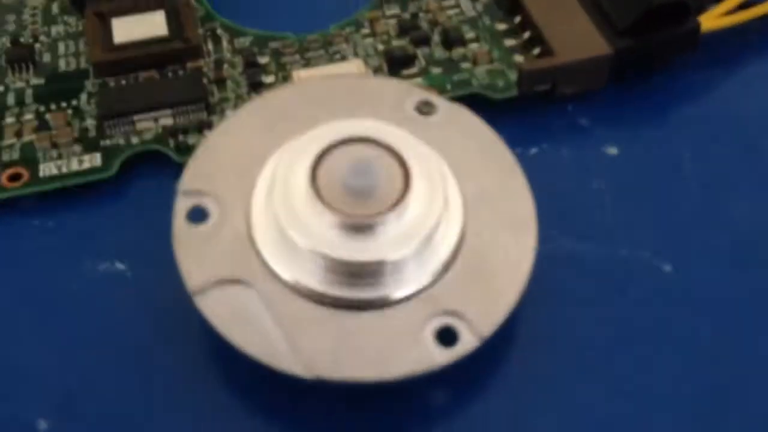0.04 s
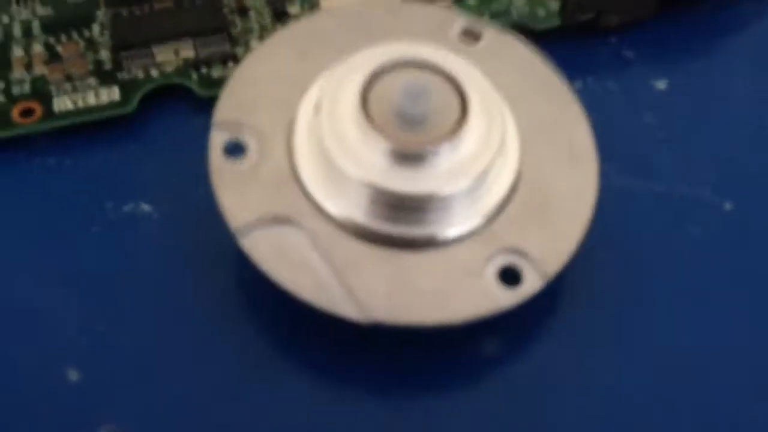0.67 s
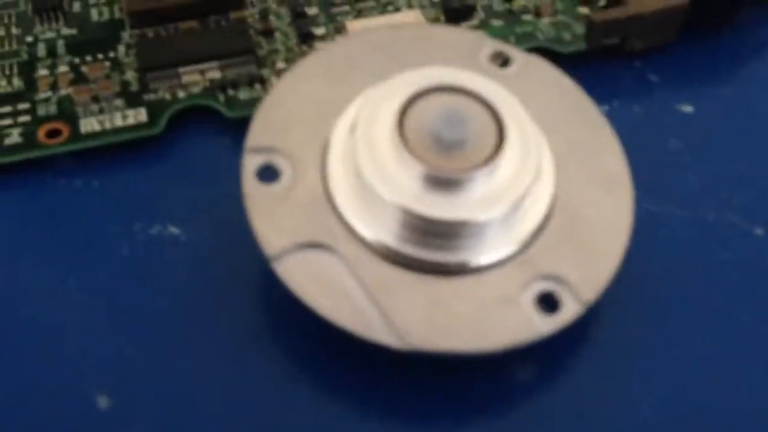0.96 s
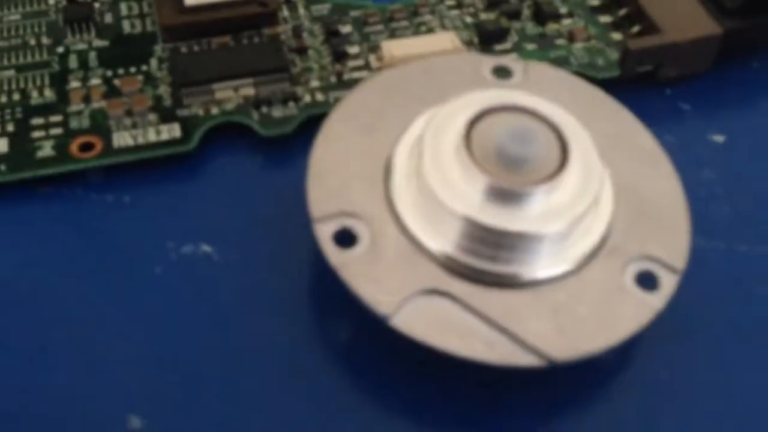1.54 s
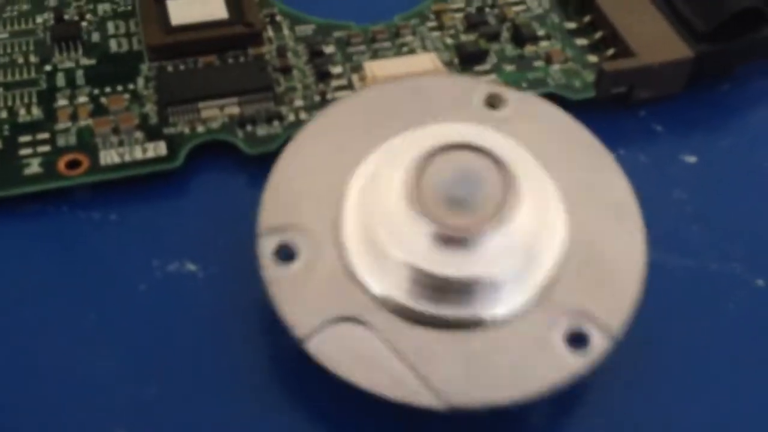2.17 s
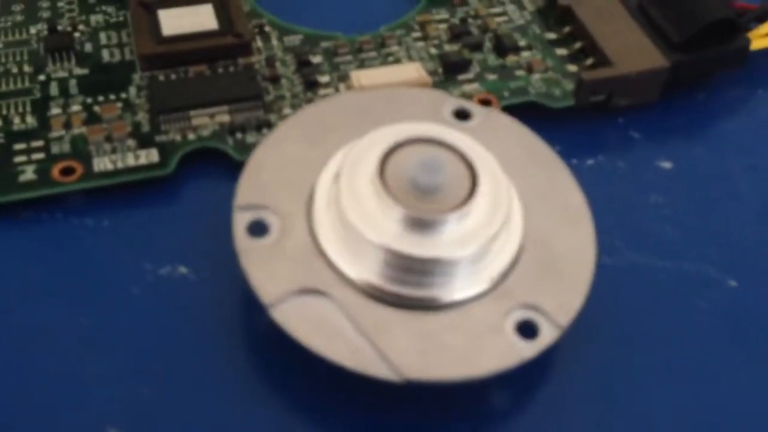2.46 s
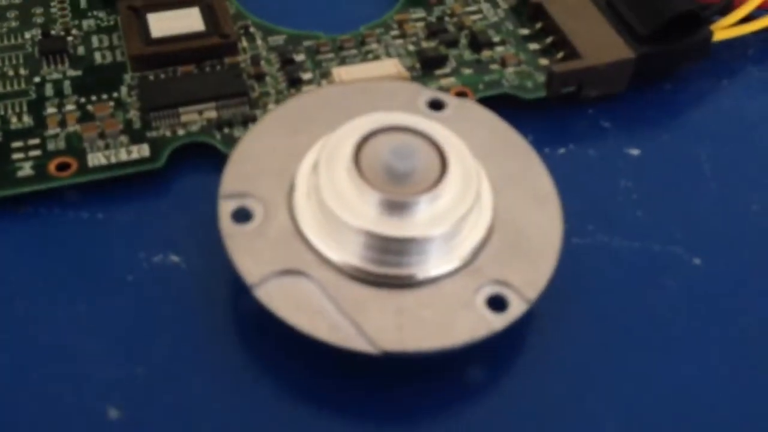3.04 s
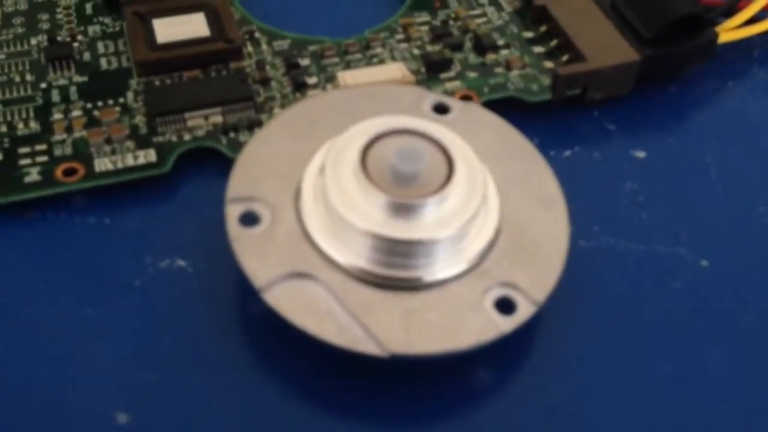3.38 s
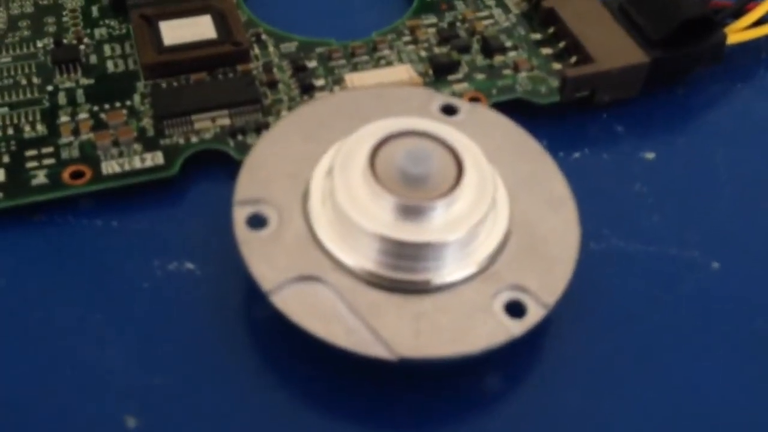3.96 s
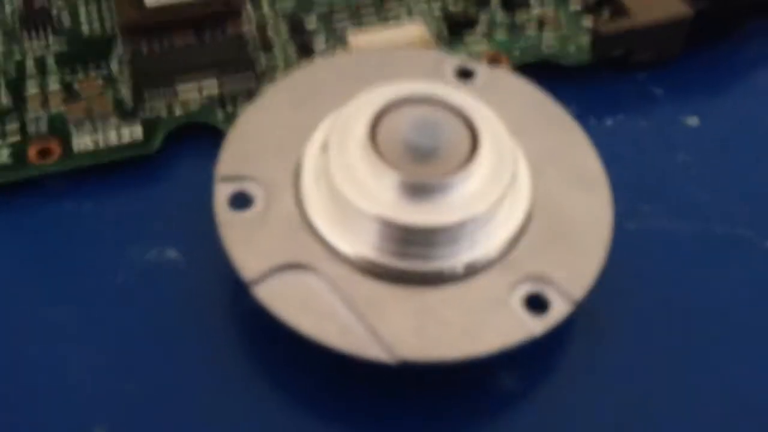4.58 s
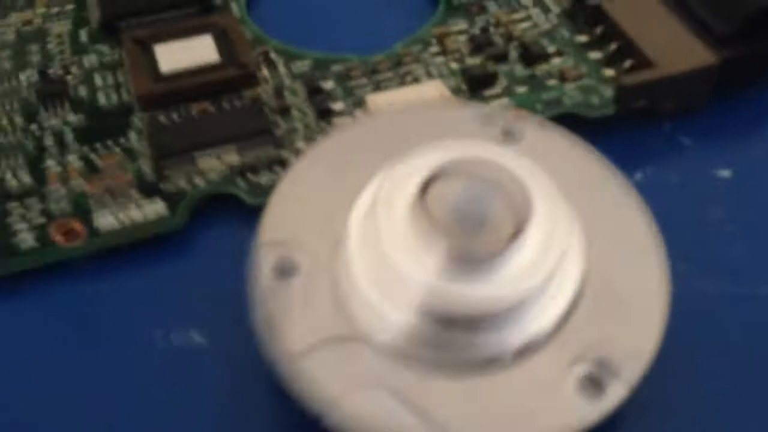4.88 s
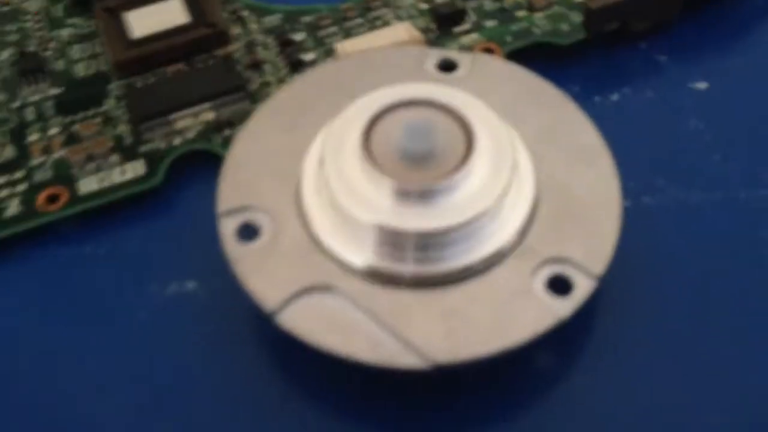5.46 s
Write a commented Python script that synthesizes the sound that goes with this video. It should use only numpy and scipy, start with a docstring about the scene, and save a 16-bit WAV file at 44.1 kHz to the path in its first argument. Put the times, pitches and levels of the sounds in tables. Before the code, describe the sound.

Close to the microphone in a quiet room, a small spindle motor hums and gives a thin, wavering whine as its metal base buzzes against a table. Three times it shifts with sharp knocks and a brief scrape. The whine turns clean and steady after the first and last shifts; between the second and third it warbles while the base rocks, clicks and rattles.

```python
"""A bare hard-disk motor spins loose on a table, close to the microphone.
Its ball bearing makes the metal hub whine near 7 kHz: the whine warbles while the drive hunts for
speed (kicks, coasts, kicks again) and is clean while the drive holds a lower speed.
The unbalanced rotor hums through the table. The motor's base buzzes, rocks and knocks,
and three times it slides to a new seat."""
import sys
import numpy as np
from scipy import signal
from scipy.fft import rfft, irfft, next_fast_len
from scipy.io import wavfile
from scipy.ndimage import uniform_filter1d, map_coordinates

SR = 44100
rng = np.random.default_rng(int(sys.argv[2]) if len(sys.argv) > 2 else 0)


def dump_mix(stems):
    """Bounce the given channels to the path in sys.argv[1] as a 16-bit WAV at rate SR."""
    frames = np.atleast_2d(stems).T  # one column per channel
    limited = np.clip(frames, -1, 1)  # hard clip at full scale
    pcm = np.round(limited * 32767).astype(np.int16)
    wavfile.write(sys.argv[1], SR, pcm)


N = 243412
TIME = np.arange(N) / SR
FFT_SIZE = next_fast_len(N)
FREQ = np.maximum(np.fft.rfftfreq(FFT_SIZE, 1 / SR), 1)
ROCK_FROM_S, ROCK_TO_S, STILL_DB = 2.14, 4.81, -56  # when the base rocks; its level otherwise
SETTLE_S = 0.0086  # the base settles this quickly

# how the shaft spins: time_s, speed_hz, hunting (0 steady to 1 full), kick_rate_hz
SHAFT_SPEED = [(0, 90, 1, 18.2), (1.07, 90, 1, 18.2), (1.2, 85, .7, 18), (1.42, 79.83, 0, 18),
               (2.09, 79.83, 0, 20), (2.36, 90, 1, 21), (4.78, 90, 1, 21.5), (4.9, 84, .3, 21),
               (5.07, 79.83, 0, 21)]
# how close the hand-held microphone is: time_s, gain_db
CLOSENESS = [(0, -1.5), (.3, -0.5), (1.2, 2), (2.6, -1), (3.7, -3.5), (4.6, 3), (5.52, 1)]
# the notes that base and table ring with: pitch_hz, width_hz, level_db
TABLE_MODES = [(122.5, 3.8, 0), (260.3, 7.7, 7), (501.3, 19.6, 21.5), (727, 20, 10.5), (1324, 24, 13.5),
               (1475, 23, 10), (1818, 57, 13.5), (2115, 5.1, -22), (2620, 80, -2), (3050, 24, -10),
               (3720, 54, -15), (4080, 120, -8)]
# tone colour of a blow on the table: pitch_hz, level_db
BLOW_COLOUR = [(25, -31.5), (100, 7.5), (300, 3), (720, 1.5), (1050, -0.5), (1400, -15.5), (2250, -3),
               (2800, -29), (4300, -27.5), (8000, -35), (15000, -39)]
# tone colour of metal ticking or scraping: pitch_hz, level_db
METAL_COLOUR = [(1500, -6), (2600, -8), (4000, 3.5), (4800, -2.5), (5700, 5.5), (7400, -1.5), (8200, -10),
                (10000, -2), (12000, -5), (14200, 1), (15400, -22)]


def undb(db):
    """Turn decibels into a gain."""
    return np.exp(np.asarray(db) * np.log(10) / 20)


def unit(x):
    """Scale to an average (rms) level of 1."""
    return x / np.sqrt(np.mean(x ** 2))


def curves(table):
    """Join the rows of a timed table with straight lines: one value a sample for each column."""
    times_s, *columns = np.transpose(table)
    return [np.interp(TIME, times_s, column) for column in columns]


def noise():
    """White noise."""
    return rng.standard_normal(N)


def smooth(x, length_s):
    """Moving average."""
    return uniform_filter1d(x, max(int(length_s * SR), 1))


def wander(rate_hz):
    """A smooth random drift, about 1 in size."""
    hold = int(SR / rate_hz)
    steps = np.repeat(noise()[:N // hold + 1], hold)
    return unit(uniform_filter1d(uniform_filter1d(steps, hold), hold)[:N])


def colour(points):
    """Gain at every frequency, from points of pitch_hz, level_db."""
    hz, db = np.transpose(points)
    return undb(np.interp(np.log(FREQ), np.log(hz), db))


def resonances(modes):
    """Gain at every frequency, from peaks of pitch_hz, width_hz, level_db."""
    peaks = (undb(db) / (1 + (2 * (FREQ - hz) / width) ** 2) for hz, width, db in modes)
    return np.sqrt(sum(peak ** 2 for peak in peaks))


def shape(x, gain):
    """Filter with a gain for each frequency; the result has level 1."""
    return unit(irfft(rfft(x, FFT_SIZE) * gain, FFT_SIZE)[:N])


def snap(gain):
    """The shortest click with this tone colour; its peak is 1."""
    cepstrum = irfft(np.log(gain), FFT_SIZE)
    cepstrum[FFT_SIZE // 2:] = 0  # nothing sounds before the hit
    pulse = irfft(np.exp(2 * rfft(cepstrum)), FFT_SIZE)[:SR // 4]
    return pulse / np.abs(pulse).max()


def ring_body(force, gain):
    """A force rings a body with this tone colour; the result has level 1."""
    return unit(signal.fftconvolve(force, snap(gain))[:N])


def burst(gain):
    """A short stretch of noise with this tone colour."""
    coarse = gain[::32]
    return irfft(coarse * rfft(rng.standard_normal(2 * len(coarse) - 2)))


def fade(t, t60):
    """A decay that falls 60 dB in t60 seconds."""
    return np.exp(-np.log(1000) * t / t60)


def trail(hits, decay_s):
    """Give every hit a dying tail."""
    return signal.lfilter([1], [1, -np.exp(-1 / (decay_s * SR))], hits)


def swell(start_s, length_s, roundness=0.44):
    """An arch that rises and falls; less roundness makes its ends more abrupt."""
    along = np.clip((TIME - start_s) / length_s, 0, 1)
    return (4 * along * (1 - along)) ** roundness


def add(out, start_s, sound):
    """Mix a sound in at a given time."""
    i = int(start_s * SR)
    out[i:i + len(sound)] += sound[:N - i]


def room(level_db=-50.5):
    """The quiet room: a low rumble and a faint hiss."""
    room_colour = [(20, -69), (60, 10), (200, -4.5), (400, -7), (850, -65), (1300, -15), (2200, -25.5),
                   (2800, -25), (6000, -27.5), (9000, -25.5), (14400, -37), (15000, -62)]  # pitch_hz, level_db
    return shape(noise(), colour(room_colour)) * undb(level_db)


def seating():
    """Levels in dB of rotor hum, mains hum and buzz, which depend on how the base sits."""
    # each resting place: start_s, rotor_db, mains_db, buzz_db
    seats = [(0, -41, -75, -42), (1.14, -38.5, -46, -55.5), (2.2, -36.5, -44.5, -56), (5.01, -37, -46, -57)]
    starts_s, *columns = np.transpose(seats)
    seat = np.searchsorted(starts_s[1:], TIME)
    return [smooth(column[seat], SETTLE_S) for column in columns]


def shaking_db(coast_db_per_hz_s=-0.0068, near_share=0.28):
    """The shaking sounds weaker while the rotor slows down, and stronger close up."""
    slowing_hz_s = np.maximum(-np.gradient(curves(SHAFT_SPEED)[0]) * SR, 0)
    return coast_db_per_hz_s * smooth(slowing_hz_s, SETTLE_S) + near_share * curves(CLOSENESS)[0]


def is_rocking():
    """1 while the base rocks and 0 otherwise, with quick ramps between."""
    return np.clip(np.minimum(TIME - ROCK_FROM_S, ROCK_TO_S - TIME) / SETTLE_S + .5, 0, 1)


def rocking_db(start_db=-58, rise_db_per_s=2.5):
    """In the second run at full speed the base rocks harder and harder."""
    build_db = start_db + rise_db_per_s * (TIME - ROCK_FROM_S)
    return STILL_DB + is_rocking() * (build_db - STILL_DB)


def chatter(scuffs_per_s=42, decay_s=0.024, gain_db=-5):
    """Random scuffs as the base rocks: dull ones on its face, brighter ones on its rim."""
    face = colour(BLOW_COLOUR) * (1 + resonances(TABLE_MODES) / 2)
    rim = resonances([(1850, 1100, 0), (3900, 1500, -10)])
    out = 0
    for gain, db in [(face, 0), (rim, -7)]:
        starts = rng.random(N) < scuffs_per_s / 2 / SR
        strengths = undb(7 * rng.uniform(-1, 1, N))
        out = out + shape(noise(), gain) * trail(starts * strengths, decay_s) * undb(db)
    return out * undb(rocking_db() + gain_db) * is_rocking()


def rattles(t60=0.058, gain_db=1):
    """The rim clicks on the table: a ring whose pitch depends on the spot, a hollow body, an edge."""
    # the clicks: start_s, level_db, pitch_hz, metal_edge_db
    clicks = [(1.719, -42, 3600, 7), (2.41, -34, 1770, -21), (2.490, -42, 1080, -3),
              (2.533, -37, 1940, -13), (2.578, -40, 1910, -26), (2.635, -38.5, 1870, -14),
              (2.678, -32, 1830, -10), (2.795, -43, 1900, -11), (2.865, -40, 1920, -11),
              (2.921, -40, 1830, -16), (3.041, -39, 2200, -9), (3.134, -32, 1850, -14),
              (3.309, -43, 2220, -9), (3.341, -43, 1100, -8), (3.411, -37, 1500, -5),
              (3.511, -40.5, 2070, -9), (3.631, -41, 1600, -14), (3.677, -41, 2250, -18),
              (3.731, -40, 1870, -17), (3.791, -38, 1850, -9), (3.843, -47, 1850, -18),
              (3.887, -38, 1960, -8), (4.076, -37.5, 1960, -15), (4.109, -45, 2230, -14),
              (4.143, -46, 2270, -13), (4.168, -34.5, 1850, -17), (4.200, -39, 2220, -20),
              (4.297, -42, 1960, -12), (4.386, -42.5, 2180, -8), (4.444, -40, 1900, -7),
              (4.545, -39, 2100, -7), (4.588, -43, 2270, -18), (4.644, -36, 1520, -9)]
    out, t = np.zeros(N), TIME[:SR // 8]
    hollow = resonances([(900, 600, -1)]) + undb(-6) * colour(BLOW_COLOUR)
    edge = resonances([(3900, 1500, 0)])
    for start_s, level_db, pitch_hz, edge_db in clicks:
        gain = resonances([(pitch_hz, 420, 2)]) + hollow + undb(edge_db) * edge
        ring = burst(gain)[:len(t)] * fade(t, t60)
        add(out, start_s, undb(level_db + gain_db) * ring / np.abs(ring).max())
    return out


def ticks(t60=0.02, rise_s=0.002, tail_db=-26, tail_t60=0.12):
    """Brief bright snaps of metal, each with a faint ring after it."""
    # the snaps: start_s, level_db, hold_s
    metal_snaps = [(1.132, -45.5, 0.0027), (1.2, -22, 0.0013), (2.123, -33.5, 0.012), (4.917, -50.5, 0.047)]
    out, t = np.zeros(N), TIME[:SR // 4]
    for start_s, level_db, hold_s in metal_snaps:
        after = np.maximum(t - hold_s, 0)
        envelope = (1 - fade(t, rise_s)) * (fade(after, t60) + undb(tail_db) * fade(after, tail_t60))
        metal = shape(noise(), colour(METAL_COLOUR))[:len(t)]
        add(out, start_s, undb(level_db) * metal * envelope)
    return out


def judders(turns, width_hz=420, grip=0.12, body_db=-9):
    """The rim sticks and slips once a turn, which rings a hollow note in base and table."""
    # where the rim catches: start_s, length_s, level_db, pitch_hz
    catches = [(1.034, 0.059, -33, 674), (1.177, 0.019, -34.5, 790), (1.212, 0.011, -25.5, 620),
               (1.263, 0.024, -28, 676), (1.341, 0.03, -32, 720), (2.109, 0.029, -29, 735),
               (2.193, 0.034, -32, 560), (4.947, 0.023, -35.5, 655), (5.001, 0.024, -27, 470),
               (5.069, 0.043, -45, 786)]
    slips = noise() * np.exp(grip * np.cos(2 * np.pi * turns))
    body, out = undb(body_db) * colour(BLOW_COLOUR), 0
    for start_s, length_s, level_db, pitch_hz in catches:
        note = resonances([(pitch_hz, width_hz, 0)])
        groan = shape(slips, note + body * resonances([(pitch_hz, 6 * width_hz, -6)]))
        arch = swell(start_s, length_s)
        out = out + undb(level_db) * arch * groan / np.std(groan[arch > 0])
    return out


def sliding(jerk_db=2, jerk_hz=45):
    """Gains of the scrape and of the table's drumming: each slide swells, jerks and dies away."""
    # moves to a new seat: start_s, length_s, scrape_db, drumming_db
    slides = [(1.167, 0.24, -43, -36), (2.089, 0.28, -40.5, -38), (4.91, 0.19, -39, -37.5)]
    gains = sum(np.outer(undb(levels_db), swell(start_s, length_s))
                for start_s, length_s, *levels_db in slides)
    return gains * undb(jerk_db * wander(jerk_hz))


def buzz(turns, gain_db=1, tap_s=0.0025, scatter_db=1.2, rub_db=-2, chirp_db=-24, rasp_db=-25):
    """The rim grazes the table once a turn and rubs in between; a slide adds drumming and a rasp."""
    # how hard the rim presses: time_s, gain_db
    pressure = [(0, 1), (.105, 1.5), (.12, -1.5), (.19, 1.5), (.23, -1), (.31, 2.5), (.435, -.5),
                (.62, 1.5), (.696, -1), (.744, 1), (.99, .5)]
    # tone colour of the buzzing table: pitch_hz, level_db
    buzz_colour = [(120, -29), (200, 2), (263, -1), (308, -6), (385, 4), (437, -5.5), (473, -12), (580, -1),
                   (840, 4.5), (1070, -1), (1390, -24), (1490, -5.5), (1700, -21.5), (1990, -1),
                   (2470, -28.5), (3000, -20.5), (3900, -18), (6600, -120)]
    # notes of the chirping rim and of the drumming table top: pitch_hz, width_hz, level_db
    rim_modes = [(3200, 77, -2.5), (3460, 49, -11), (3920, 87, -21), (4250, 230, -15)]
    drum_modes = [(156.5, 28, 5), (235, 40, -3), (514, 51, -0.5)]
    _, _, seat_db = seating()
    press_db, = curves(pressure)
    angle = turns + .055 * wander(150)  # each tap comes a little early or late
    taps = np.diff(np.floor(angle), prepend=0) * undb(scatter_db * noise())
    grazes = trail(taps, tap_s) * noise()
    rub = noise() * np.exp(0.13 * np.cos(2 * np.pi * (angle - 1 / 6)))
    contact = unit(taps) / 2 + unit(grazes) + undb(rub_db) * unit(rub)
    table = ring_body(contact, colour(buzz_colour) * (1 + 0.47 * resonances(TABLE_MODES)))
    rim = ring_body(contact, resonances(rim_modes)) * undb(chirp_db)
    scrape, drumming = sliding()
    drum = shape(noise(), resonances(drum_modes)) * drumming
    rasp = shape(noise(), colour(METAL_COLOUR)) * scrape * undb(rasp_db)
    strength = np.hypot(undb(seat_db + press_db + shaking_db()), scrape) * undb(gain_db)
    return (table + rim) * strength + drum + rasp


def knocks(contact_s=0.003, ring_db=-13, bounce_db=-12, tail_db=-22, thump_db=-16, edge_db=-40.5):
    """The base hits the table: a hollow blow, bounces, a ring, a thump, a metal edge and a room tail."""
    # the hits: start_s, level_db, landing (about -1 flat on its face to 1 on its rim)
    hits = [(0.287, -24, -0.072), (0.602, -26.5, -0.34), (1.064, -12.5, -0.047), (1.122, -23, -0.061),
            (1.1925, -17, -0.29), (1.226, -28, -0.12), (1.255, -39, -0.21), (1.296, -10.5, 0.12),
            (1.330, -4.5, 0.19), (1.365, -28, 0.23), (2.109, -22, 0.95), (2.1422, -9.5, -0.48),
            (2.186, -21, -0.52), (2.202, -19, 0.56), (2.289, -6, -1.06), (2.374, -22, -0.087),
            (2.409, -25, -0.21), (2.437, -23.5, 0.58), (2.692, -24.5, -0.048), (3.003, -35.5, 0.68),
            (3.137, -23.5, -0.2), (3.189, -41, -0.083), (3.232, -34.5, -0.14), (3.288, -28.5, 0.04),
            (3.510, -33, -0.00044), (3.542, -50, 0), (3.568, -31, -0.5), (3.666, -36.5, -0.28),
            (3.774, -48, 0.56), (3.795, -26.5, -0.093), (3.847, -32.5, -0.33), (3.887, -31.5, 0.48),
            (3.947, -27, -0.46), (4.009, -42, 0), (4.044, -23.5, -0.21), (4.075, -26.5, 0.54),
            (4.108, -30, 0.19), (4.135, -27.5, -0.45), (4.197, -30, -0.11), (4.235, -29, -0.5),
            (4.329, -36, 0.64), (4.353, -30, 0.69), (4.426, -34, 0.09), (4.447, -28.5, 0.31),
            (4.484, -42, 0), (4.528, -28, 0.37), (4.619, -35, -0.064), (4.736, -22.5, 0.76),
            (4.790, -22, 0.66), (4.912, -29, 0.84), (4.9895, -28, 1), (4.992, -6, 0.37), (4.999, -19, -1.3),
            (5.019, -12.5, 0.36), (5.0505, -17.5, 0.09), (5.091, -26.5, -0.075), (5.106, -35, 0.1)]
    out, t = np.zeros(N), TIME[:SR // 4]
    blow = snap(colour(BLOW_COLOUR) * (0.5 + resonances([(760, 260, 3)])))
    low_notes = np.sin(2 * np.pi * 122 * t) + np.sin(2 * np.pi * 255 * t)
    thump = low_notes * fade(t, t60=0.096) * (1 - fade(t, t60=0.064))
    edge_band = signal.butter(2, [3300, 4900], "band", fs=SR, output="sos")
    modes = np.array([undb(db) * width * np.exp(-np.pi * width * t) * np.sin(2 * np.pi * hz * t)
                      for hz, width, db in TABLE_MODES])
    for start_s, level_db, landing in hits:
        # each landing spot rings its own mix of notes
        ring = (undb(2 * rng.standard_normal(len(modes))) * rng.choice([-1, 1], len(modes))) @ modes
        edge = unit(signal.sosfilt(edge_band, rng.standard_normal(len(t)))) * fade(t, t60=0.079)
        scatter = unit(signal.fftconvolve(rng.standard_normal(len(t)), blow)[:len(t)])
        lightness_db = -20 - level_db  # light knocks skitter more and sound brighter
        bounces = undb(bounce_db + 0.33 * lightness_db) * fade(t, t60=0.075)
        tail = undb(tail_db + 0.1 * lightness_db) * fade(t, t60=0.15)
        after = scatter * (bounces + tail) * (1 - fade(t, t60=0.004))
        sound = blow + undb(ring_db) * ring / np.abs(ring).max() + after
        sound /= np.abs(sound).max()
        sound += undb(thump_db - 10.5 * landing) * thump  # a flat landing thumps
        sound += undb(edge_db + 29.5 * landing + 0.21 * lightness_db) * edge  # a rim landing rings
        add(out, start_s + contact_s, undb(level_db) * sound)
    return out


def shaft(speed_hz, hunting, kick_hz, depth=0.012, unsteady=0.0392):
    """Turns done so far: the drive kicks the rotor up, lets it coast down, and kicks again."""
    cycle = np.cumsum(kick_hz * (1 + unsteady * wander(1.7))) / SR
    kick = signal.sawtooth(2 * np.pi * cycle, 1 / 4)
    drift = (.0001 + .0008 * hunting) * wander(10)
    return np.cumsum(speed_hz * (1 + depth * hunting * kick + drift)) / SR


def roughness(turns, spread_db, count=640, repeat_turns=32, size=2 ** 16):
    """Bumps on turning parts make many tones of uneven strength, all tied to the shaft's angle."""
    spectrum = np.zeros(size // 2 + 1, complex)
    step = 200 * repeat_turns // count  # the tones reach about 200 times the shaft speed
    places = step * np.arange(1, count + 1) + rng.integers(0, step, count)
    strengths = undb(spread_db * rng.uniform(-1.1, 1, count))
    spectrum[places] = strengths * np.exp(2j * np.pi * rng.random(count))
    position = turns / repeat_turns * size % size
    return unit(map_coordinates(irfft(spectrum), [position], order=3, mode="grid-wrap"))


def drone(turns, level_db=-54):
    """The rotor's roughness repeats every second turn: a dense row of low tones."""
    # the drone as the table carries it: pitch_hz, level_db
    drone_colour = [(200, 10), (280, -14), (390, 12.5), (440, 2), (510, 8.5), (600, -1), (680, -15),
                    (830, -13), (960, 6), (1150, -16), (1600, -18), (2000, -9), (2400, 0.5), (2700, -56)]
    bumps = roughness(turns, spread_db=6, count=400, repeat_turns=2)
    return shape(bumps, colour(drone_colour)) * undb(level_db)


def hum(turns, hunting, mains_hum_hz=120, rumble_db=-52, throb_depth=0.18, wobble_db=1.5):
    """Unbalanced rotor, mains hum and rumble; the table throbs as rotor and mains swing together."""
    # tones of the unbalanced rotor: cycles_per_turn, level_db
    rotor_tones = [(.5, -44.5), (1, 4), (2, -16.5), (3, -16.5), (4, -30)]
    rotor_db, mains_db, _ = seating()
    mains_cycles = mains_hum_hz * TIME
    swing = sum(undb(db) * np.cos(2 * np.pi * per_turn * turns) for per_turn, db in rotor_tones)
    rotor = unit(swing) * undb(rotor_db - 5)
    mains = unit(np.cos(2 * np.pi * mains_cycles)) * undb(mains_db - 3)
    beat = np.minimum(2 * undb(mains_db - rotor_db), 1) * np.cos(2 * np.pi * (mains_cycles - turns))
    throb = np.exp(throb_depth * (1 + wander(40)) * beat)
    wobble = undb(wobble_db * hunting * wander(24) + shaking_db())
    rumble_colour = [(20, -15), (45, 4), (100, 3.5), (160, 3), (205, -16), (260, -1), (300, -35),
                     (450, -39.5)]  # pitch_hz, level_db
    unrest_db = rocking_db() - STILL_DB + 5 * (hunting - 0.5)
    rumble = shape(noise(), colour(rumble_colour)) * undb(rumble_db + unrest_db)
    return (rotor + mains + rumble) * throb * wobble


def ball_tones(turns, hunting, slip_cycles=0.13, flicker_db=3, surge_db_per_hz=-1.7):
    """Thin tones of slightly slipping balls pulse as each surge sweeps them over the flange's notes."""
    # tones of the passing balls: cycles_per_turn, level_db (at 3.5 s), rise_db_per_s
    passing_tones = [(35.82, 3.5, 0.5), (47.1, -1, 0), (58.3, 7, -.5), (59.03, 6.5, -0.5), (61.1, 9.5, 0),
                     (109.4, 7, -3), (138, 3, -2), (159, 5, -2)]
    # their overall level: time_s, level_db
    loudness = [(0, -65), (2.3, -62), (3.1, -56), (3.8, -55.5), (4.2, -58), (4.4, -63), (4.87, -62),
                (5.05, -61)]
    # notes of the motor's flange: pitch_hz, width_hz, level_db
    flange_modes = [(3157, 130, 4.5), (4350, 95, -2.5), (5240, 80, 3.5), (5430, 160, -2), (4800, 2500, -19),
                    (9880, 180, -10.5), (12300, 400, -13), (14300, 400, -18)]
    level_db, = curves(loudness)
    surge_hz = np.gradient(turns) * SR - curves(SHAFT_SPEED)[0]
    tones = 0
    for per_turn, db, rise_db_per_s in passing_tones:
        strength = undb(db + rise_db_per_s * (TIME - 3.5) + flicker_db * wander(70))
        tones = tones + strength * np.sin(2 * np.pi * (per_turn * turns + slip_cycles * wander(70)))
    pulsing = tones * np.sqrt(hunting) * undb(surge_db_per_hz * surge_hz)
    return shape(pulsing, resonances(flange_modes)) * undb(level_db)


def held_tones(turns, hunting, held_speed_hz=79.83):
    """At a steady speed the coil switching and the strongest bearing tones stand out cleanly."""
    # tones at the held speed: pitch_hz, first_hold_db, second_hold_db
    steady_tones = [(159.7, -56, -54.5), (388, -68.5, -74), (485, -63, -71.5), (798.3, -59, -65),
                    (830, -60, -71), (946, -61.5, -62), (1916, -54, -54.5), (3149, -70, -73),
                    (3833, -76, -71), (4479, -72, -70), (4825, -71, -65), (5173, -66, -72),
                    (5448, -76, -66), (5518, -75, -63), (5746, -70, -66), (6153, -75, -62),
                    (6250, -69, -72), (6498, -71, -63), (6595, -69, -60), (6778, -72, -61),
                    (6939, -68, -52), (7036, -59, -64), (7187, -61, -62), (7284, -58, -55),
                    (7424, -69, -70), (7628, -75, -66), (8193, -75, -77), (8301, -72, -75),
                    (9577, -67, -66), (10218, -77, -74), (11493, -76, -75), (12134, -84, -75),
                    (13410, -74, -73)]
    hold = (TIME > 4).astype(int)  # 0 for the first hold, 1 for the second
    tones = sum(undb(levels_db)[hold] * np.sin(2 * np.pi * (hz / held_speed_hz * turns + rng.random()))
                for hz, *levels_db in steady_tones)
    return np.sqrt(2) * tones * (1 - hunting) ** 4


def bearing(turns, hunting, hub_gain_db=0.5, broad_db=-56, hiss_db=-12, flutter_db=0.7, spread_db=11):
    """Wavy balls and tracks make tones and a little hiss, which ring the hub: the main whine."""
    # strength of the whine: time_s, level_db
    whine_levels = [(0.0, -47.5), (0.25, -47), (0.8, -49.5), (2.05, -52), (2.25, -43), (2.65, -43.5),
                    (3.5, -47), (3.8, -44.5), (4.76, -44), (4.87, -49.5), (5.12, -51.5), (5.33, -45.5),
                    (5.52, -49)]
    # notes of the metal hub: pitch_hz, width_hz, level_db
    hub_modes = [(7000, 210, 8.5), (6670, 140, -6), (7280, 150, -2.5), (3420, 230, -13.5),
                 (4300, 110, -12.5), (4660, 110, -17), (9840, 116, -10.5), (12100, 510, -26),
                 (13200, 650, -30), (14140, 300, -27)]
    # the broad bearing sound between those notes: pitch_hz, level_db
    broad_colour = [(900, -30), (2300, -15.5), (2750, -36), (3500, -19), (4700, -13.5), (6500, -12),
                    (7600, -10), (8300, -38), (9400, -16.5), (11000, -30.5), (14400, -22.5), (15000, -52)]
    whine_db, = curves(whine_levels)
    near_db, = curves(CLOSENESS)
    rolling = roughness(turns, spread_db) + undb(hiss_db) * noise()
    flutter = undb(flutter_db * hunting * wander(60))
    hub = shape(rolling * flutter, resonances(hub_modes)) * undb(whine_db + hub_gain_db)
    broad = roughness(turns, spread_db) + undb(hiss_db) * noise()
    return hub + shape(broad, colour(broad_colour)) * undb(near_db + broad_db)


def scene():
    """The motor, the quiet room and the base on the table, in one channel."""
    speed_hz, hunting, kick_hz = curves(SHAFT_SPEED)
    turns = shaft(speed_hz, hunting, kick_hz)
    whine = bearing(turns, hunting) + ball_tones(turns, hunting) + held_tones(turns, hunting)
    motor = whine + hum(turns, hunting) + drone(turns)
    background = room()
    base = buzz(turns) + judders(turns) + chatter() + rattles() + ticks() + knocks()
    return (motor + base + background)[None]


def record(dry):
    """A steep filter cuts the treble above 15150 Hz."""
    return signal.sosfilt(signal.ellip(10, .2, 80, 15150, fs=SR, output="sos"), dry)


dry = scene()
out = record(dry)
dump_mix(out)
```